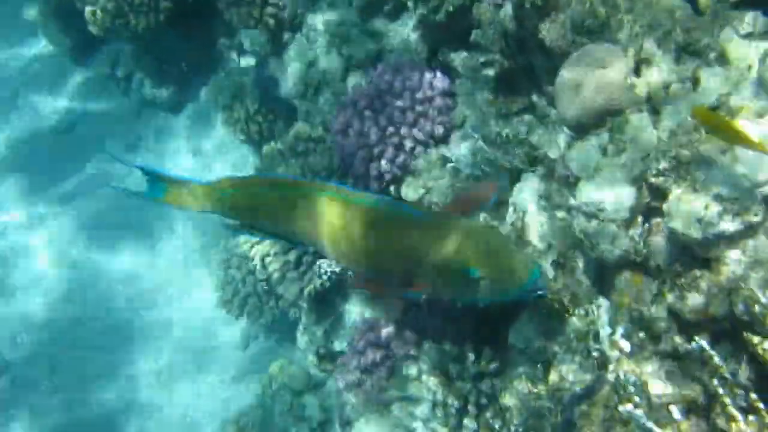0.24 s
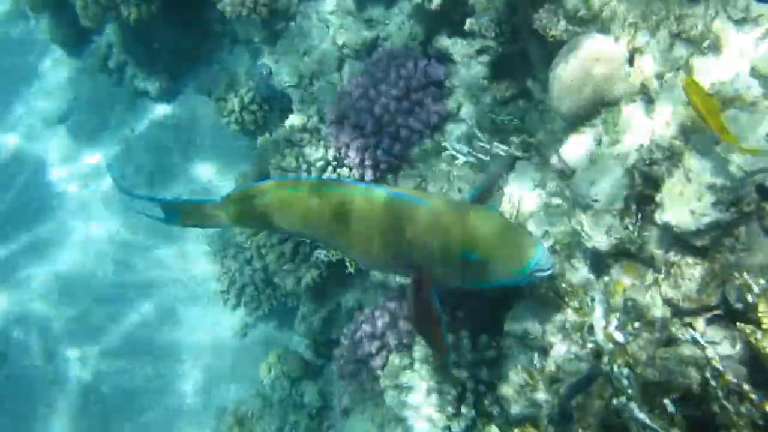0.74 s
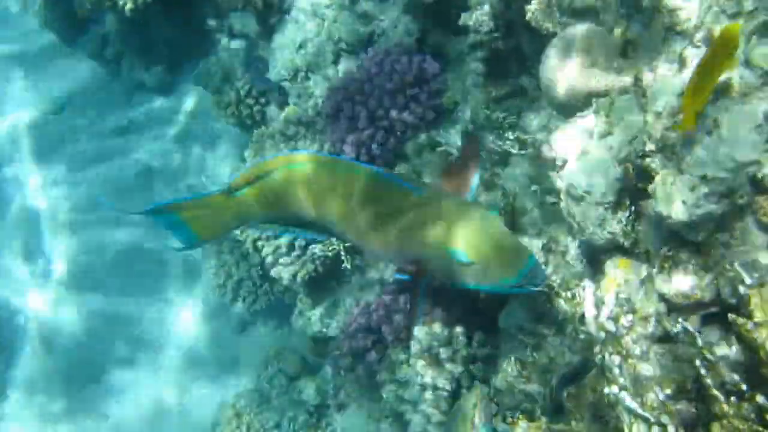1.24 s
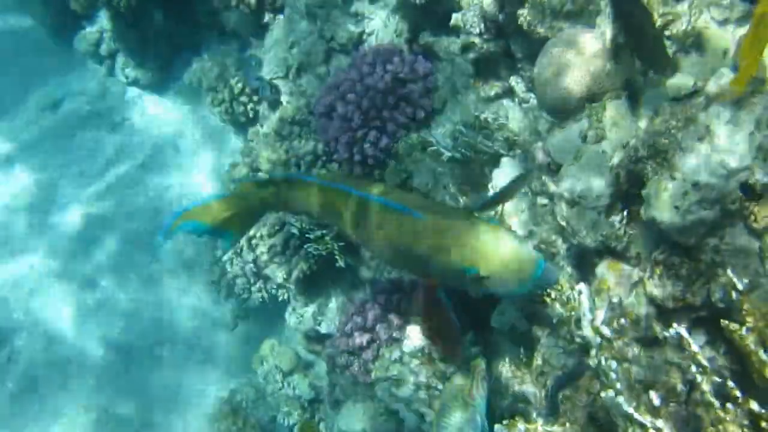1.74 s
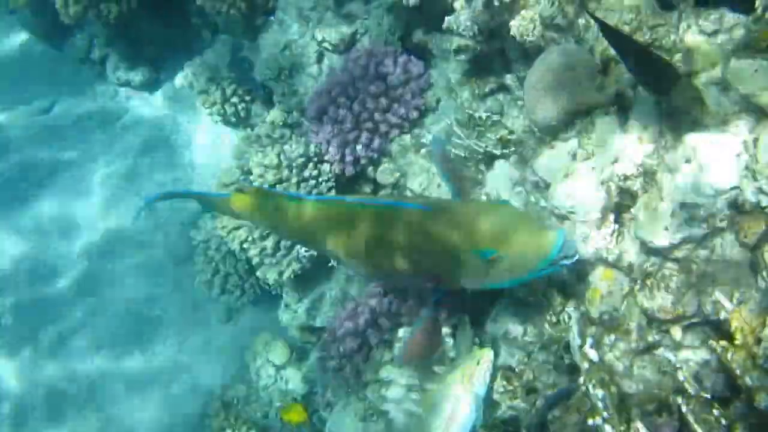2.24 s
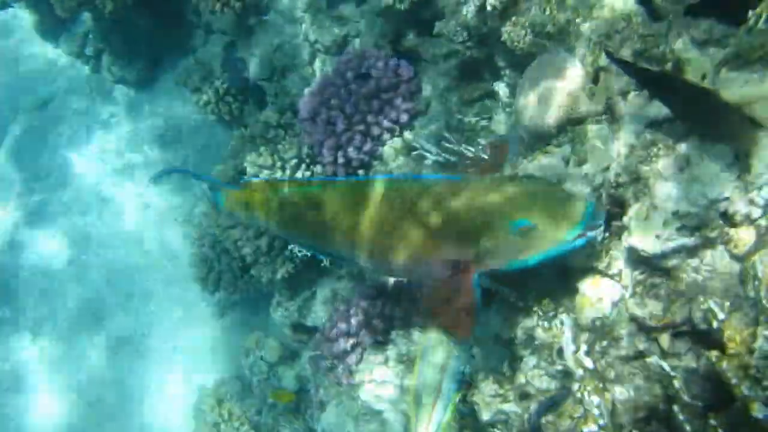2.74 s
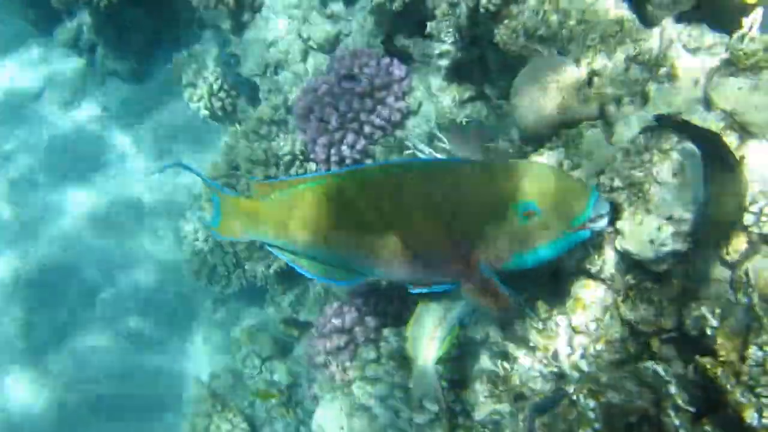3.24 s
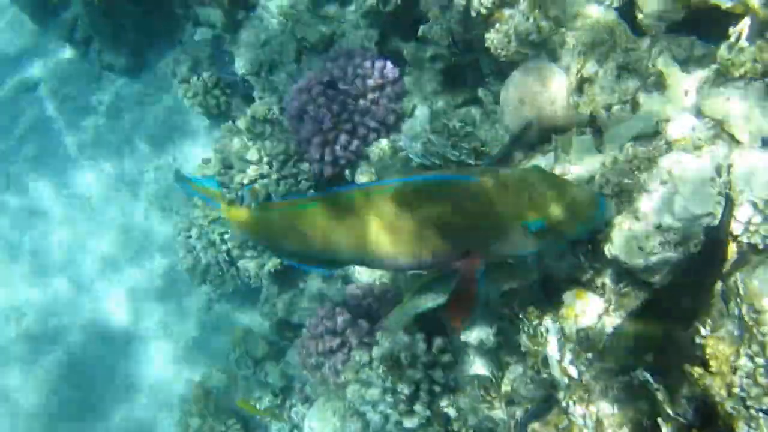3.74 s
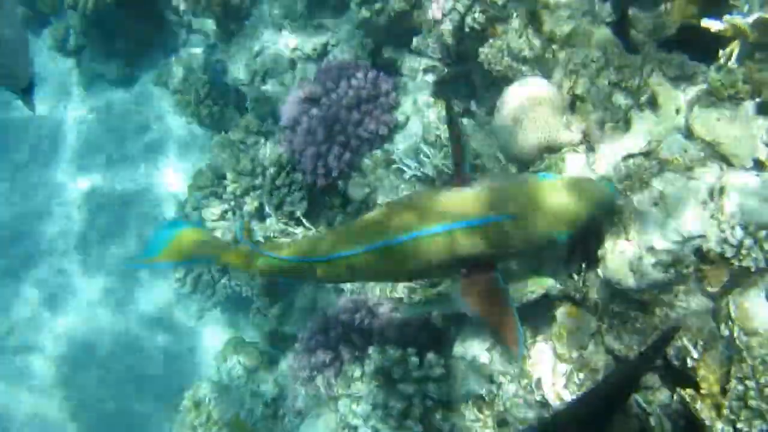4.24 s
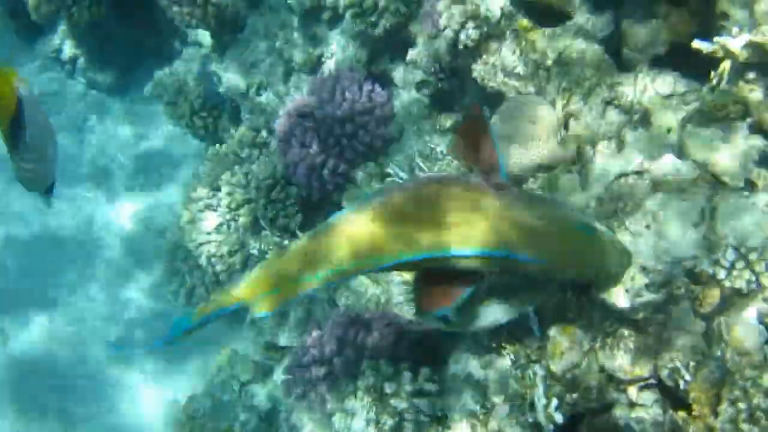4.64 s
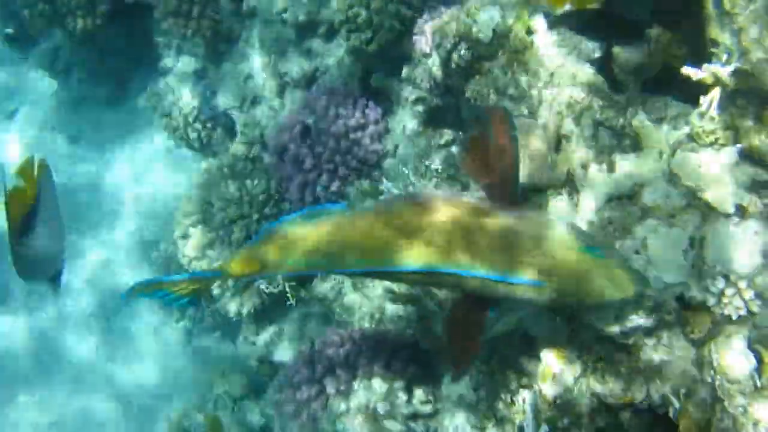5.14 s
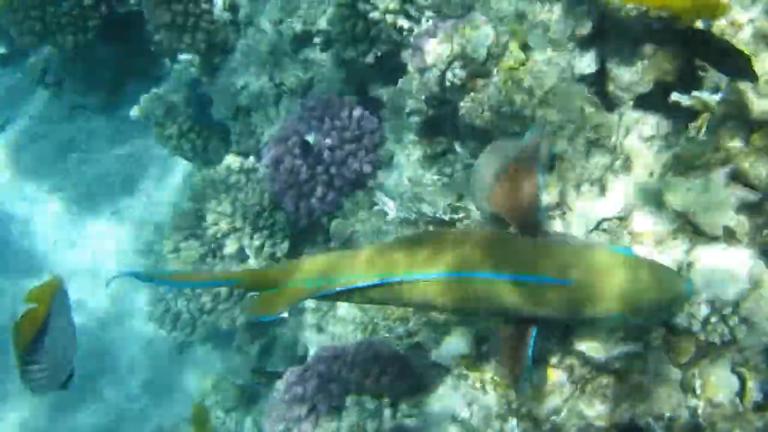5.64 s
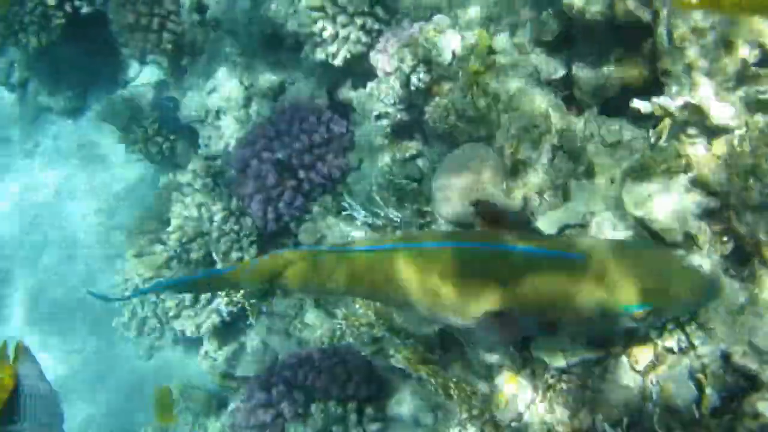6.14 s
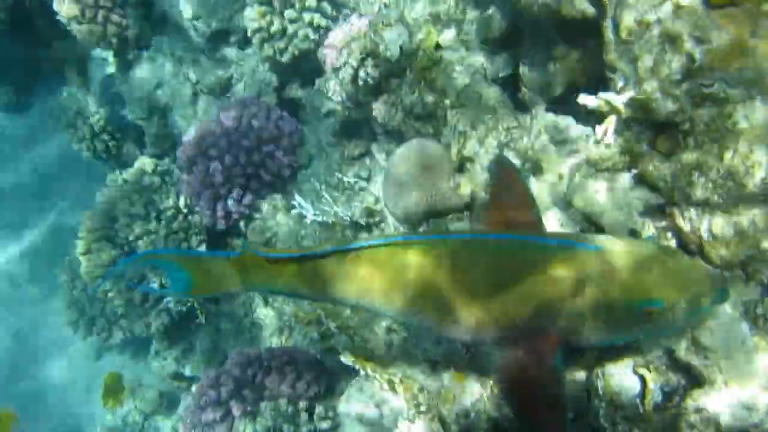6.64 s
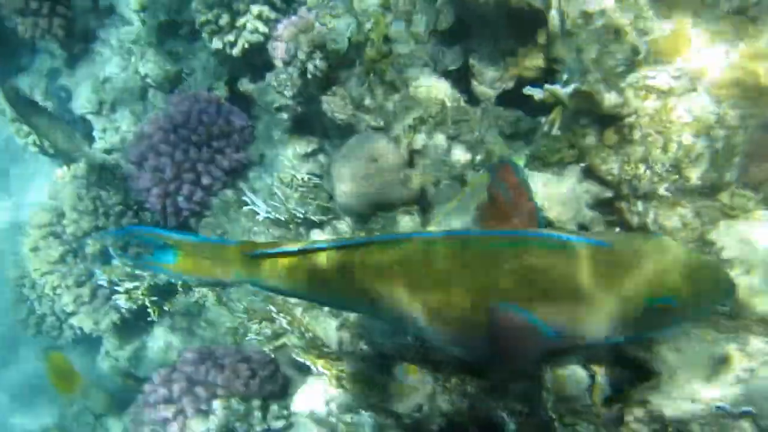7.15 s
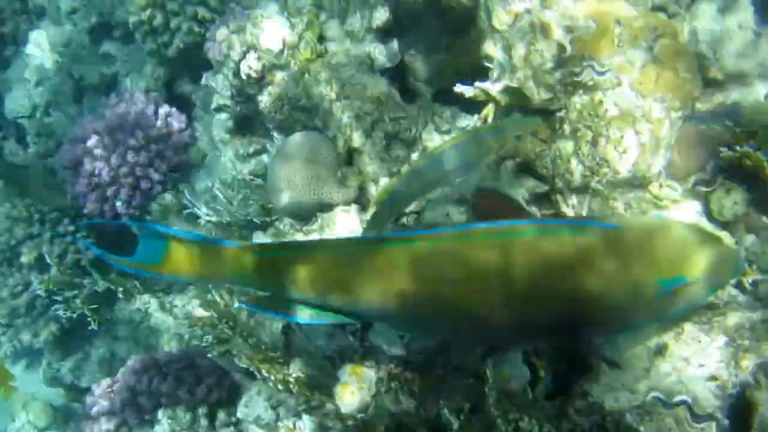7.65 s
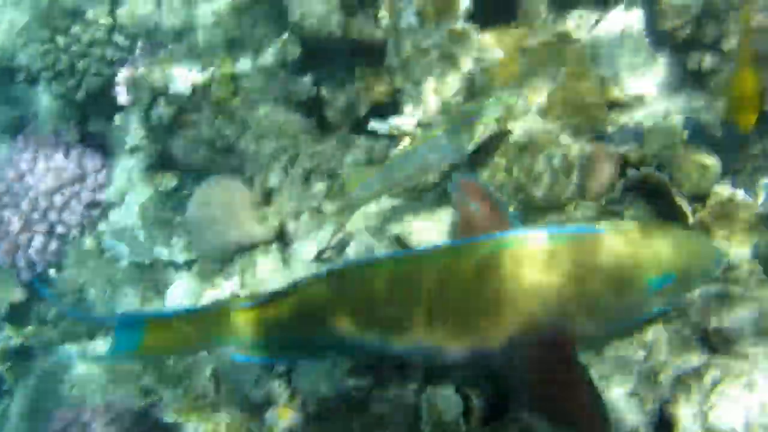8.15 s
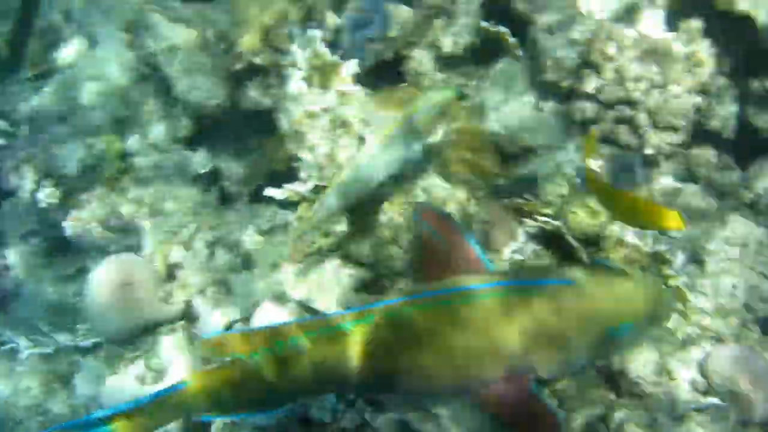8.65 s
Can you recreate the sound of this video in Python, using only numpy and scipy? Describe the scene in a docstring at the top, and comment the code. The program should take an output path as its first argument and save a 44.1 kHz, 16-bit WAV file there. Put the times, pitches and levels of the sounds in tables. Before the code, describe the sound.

Close, muffled underwater sound over a coral reef, bass-heavy, with bright little snaps scattered left and right. Water surges bump the casing, a few tiny bubbles blip, and coral breaks in dry clicks as a fish grazes. Short ringing taps follow, then a strong churning surge with gritty scraping and a very heavy thud. It quiets to shrimp sizzle and light rumble, then erupts in quick cracks and booming thumps, ending with a last short bite.

```python
"""A camera in a watertight case hovers over a coral reef where a parrotfish grazes; shrimp snap throughout.
From the start damped thumps rock the case in rumbling, gurgling flow, coral cracks and a few bubbles ring.
From 2.5 s taps ring the case modes; near 4 s, in the strongest flow, come knocks, clacks and gritty scrapes,
then the heaviest thumps at 4.8 s and, after a calm, a dense burst from 6.7 s; a last one comes at 8.2 s.
The gain starts lowered, ducks at the heaviest thumps and creeps back; the walls colour the reef's bright sounds."""
import sys
import numpy as np
from scipy import signal
from scipy.fft import rfft, irfft, next_fast_len
from scipy.io import wavfile
from scipy.ndimage import uniform_filter1d, minimum_filter1d, map_coordinates

SR = 44100
rng = np.random.default_rng(int(sys.argv[2]) if len(sys.argv) > 2 else 0)


def store_wav(level_fs):
    """Save 16-bit WAV to argv[1]."""
    pcm = np.round(np.clip(np.atleast_2d(level_fs), -1, 1) * 32767)
    wavfile.write(sys.argv[1], SR, pcm.T.astype(np.int16))


N = 392049

# faint whine of the camera: (frequency [Hz], level [dB], left over right [dB])
WHINE_TONES = [(2008, -76, 3), (5890, -82, 3.5), (15734, -91, -0.5)]
# strength of the water flowing past the case: (time [s], level over calm water [dB])
FLOW = [(0.0, 2.5), (0.5, 10), (0.8, 6), (1.09, 9.5), (1.45, -1.5), (2.45, 2.5), (2.95, -2.5), (3.8, 8),
        (4.08, 13.5), (4.7, 13.5), (5.22, 0), (6.25, 0), (6.6, -1), (7.35, 3), (7.6, 10.5), (7.92, 8),
        (8.22, 11), (8.89, -1.5)]
# spectra of the water's rumble, churn, gurgle and cavity drone: (frequency [Hz], relative level [dB])
RUMBLE_SPECTRUM = [(15, -48), (28, -23.5), (40, -6), (65, -4), (100, 2.5), (130, -2), (170, -18),
                   (260, -35), (500, -88)]
CHURN_SPECTRUM = [(80, -23.5), (130, 5), (170, 0), (218, -1), (255, -10.5), (295, -19.5), (330, -27),
                  (375, -38.5), (800, -77)]
GURGLE_SPECTRUM = [(250, -17.5), (335, -3.5), (385, -5.5), (470, 0.5), (560, -3), (680, -5), (800, -12.5),
                   (1050, -18), (1350, -15), (1650, -40), (5000, -68.5)]
DRONE_SPECTRUM = [(230, -43.5), (295, -4.5), (328, 3.5), (365, -11.5), (450, -50.5)]
# course of the cavity drone: (time [s], level [dB])
DRONE_COURSE = [(0, -44.5), (1.6, -53), (2.6, -52.5), (7.8, -56), (8.89, -45.5)]
# passing swells of the rumble and of the sloshing: (middle [s], half length [s], level [dB])
RUMBLE_SWELLS = [(1.7, 0.1, -26.5)]
SLOSH_SWELLS = [(2.36, 0.34, -45), (4.35, 0.52, -47.5)]
# hollow resonances stirred by sloshing water: (frequency [Hz], nominal width [Hz], relative level [dB])
SLOSH_MODES = [(420, 110, -15.5), (511, 130, 4.5), (686, 86, 0.5), (897, 160, -12)]
# likeness of the two ports: (frequency [Hz], coherence [0 to 1])
PORT_COHERENCE = [(100, 0.98), (200, 0.99), (320, 0.52), (500, 0.37), (1000, 0.44), (2000, 0), (16000, 0)]
# surges that shove the case: (crest time [s], level [dB], frequency [Hz])
THUMPS = [(0.308, -16.5, 114), (0.628, -13.5, 122), (0.927, -12, 129), (1.437, -8.5, 83), (1.471, -15, 82),
          (1.689, -17, 99), (1.787, -20, 80), (2.254, -11.5, 95), (2.642, -16, 117), (2.724, -16.5, 142),
          (3.214, -16.5, 95), (3.621, -15, 140), (3.968, -11.5, 193), (4.108, -7, 121), (4.135, -12, 117),
          (4.177, -10, 181), (4.354, -9, 137), (4.496, -11.5, 123), (4.586, -10.5, 152), (4.772, -4, 101),
          (4.789, -1, 196), (4.796, 0.5, 101), (4.834, -0.5, 113), (5.397, -8.5, 93), (5.667, -11, 139),
          (5.699, -13.5, 93), (6.738, 1.5, 96.5), (6.858, -5.5, 99), (6.901, -5, 129), (6.931, -11, 107),
          (6.986, 2.5, 98), (7.028, -7, 76.5), (7.062, -14, 136), (7.191, -14.5, 163), (8.21, -14.5, 115),
          (8.319, -17, 121), (8.374, -13, 112), (8.858, -10, 93)]
# dull knocks on the case, each with a short grind: (time [s], level [dB], frequency [Hz], grind level [dB])
KNOCKS = [(1.703, -30.5, 393, -41), (2.725, -20, 262, -43), (2.884, -22, 242, -28),
          (3.965, -17.5, 313, -36), (4.033, -23, 327, -38), (4.042, -17.5, 290, -39),
          (4.065, -17, 273, -38), (4.084, -10, 242, -43), (4.17, -15, 323, -31.5), (4.18, -20.5, 346, -33),
          (4.785, -1, 241, -37.5), (4.824, -11, 287, -26), (6.734, -23.5, 247, -42), (6.868, -29, 310, -36),
          (6.915, -22.5, 260, -42), (6.971, -17, 216, -42), (7.225, -26, 325, -48),
          (7.244, -14.5, 253, -58), (8.3, -19.5, 386, -35.5), (8.306, -21.5, 332, -38),
          (8.354, -15.5, 273, -44.5)]
# small bubbles: (time [s], level [dB], starting frequency [Hz])
BUBBLES = [(0.559, -49, 1230), (0.852, -48, 1360), (0.97, -48, 1410), (1.109, -52, 1250),
           (1.639, -47, 1360), (2.168, -49.5, 1490), (2.538, -43.5, 1310), (3.845, -51, 1220)]
# the nearest shrimp snaps: (time [s], level [dB], frequency [Hz], left over right [dB])
NEAR_SNAPS = [(0.148, -40, 4400, 7), (0.36, -42, 3960, 3), (0.384, -41, 2900, 0), (0.481, -45, 6500, 3),
              (1.109, -44.5, 2600, 0), (1.228, -48, 5100, 5), (1.4085, -40, 1840, 1),
              (1.699, -44.5, 2160, 5), (1.8595, -39.5, 2830, 10), (2.0917, -41, 4440, 2),
              (3.0737, -36, 2970, 1), (3.29, -42, 5160, -1), (3.477, -42, 5340, 6),
              (3.948, -44.5, 3400, -4), (4.111, -39, 4740, -1), (4.326, -42, 3970, 5),
              (4.358, -43.5, 3780, -2), (5.19, -42.5, 6760, 2), (5.333, -37.5, 4600, -2),
              (5.434, -43.5, 4100, -6), (5.56, -42, 3370, 0), (5.971, -44.5, 4100, 0),
              (6.1644, -45.5, 8140, 6), (6.367, -39, 4600, -15), (6.519, -46, 5500, -4),
              (7.1874, -36, 2570, -3), (7.4936, -38.5, 7240, 5.5), (7.605, -41, 6800, 2.5),
              (8.5963, -38.5, 4340, -2)]
# spectrum of the distant shrimp's sizzle: (frequency [Hz], relative level [dB])
SIZZLE_SPECTRUM = [(600, 1), (1100, 1.5), (1430, 2.5), (1750, -3.5), (2400, -3.5), (3300, -5.5),
                   (3900, -10.5), (5500, -11), (8000, -16), (9400, -19.5), (11500, -30), (13500, -41),
                   (16000, -44.5)]
# resonances of the wall at each port: (frequency [Hz], nominal width [Hz], level above the rest [dB])
LEFT_WALL = [(2770, 120, 3.5), (4900, 130, 6.5), (4580, 360, 7), (6180, 550, 6), (6690, 200, 5.5),
             (8570, 260, 5)]
RIGHT_WALL = [(2150, 110, 8.2), (3590, 170, 7), (4740, 160, 8), (4600, 130, 0.82), (7220, 440, 7),
              (9000, 480, 7.2)]
# crisp taps that ring the case: (time [s], level [dB], brightness [dB per octave])
TAPS = [(2.5185, -23, -0.5), (2.524, -19, -6), (2.603, -31, -8), (2.7233, -16.5, 3), (2.789, -39, -5),
        (2.847, -36.5, -10), (3.051, -22.5, -10), (5.971, -24.5, -4.5), (6.8945, -28, -2), (6.917, -33, -7),
        (6.9685, -26.5, -2), (7.187, -36, -9), (7.204, -32, -9)]
# modes of the tapped case: (frequency [Hz], relative level [dB], 60 dB decay time [s])
CASE_MODES = [(434, 0, 0.025), (511, 1, 0.026), (678, -2, 0.022), (925, -8, 0.03), (1246, -12, 0.022),
              (1380, -21, 0.029)]
# dull clacks of crumbling coral: (time [s], level [dB], frequency [Hz])
CLACKS = [(1.41, -42, 1700), (2.185, -33, 940), (2.233, -39, 1310), (2.886, -30.5, 1100), (3.986, -37, 695),
          (4.044, -46, 900), (4.054, -45, 1100), (4.065, -37, 1150), (4.077, -40, 1000),
          (4.086, -43.5, 1100), (4.125, -33.5, 1000), (4.138, -38, 1130), (4.169, -31, 990),
          (4.175, -33.5, 1130), (4.18, -33.5, 950), (4.789, -19, 700), (4.823, -33, 600), (4.833, -28, 700),
          (5.122, -35, 1050), (5.135, -37, 585), (6.7365, -30.5, 820), (6.867, -33, 800),
          (6.8725, -29, 620), (6.8945, -30.5, 650), (6.916, -32, 680), (6.968, -34, 1510),
          (8.155, -30.5, 1410), (8.172, -37, 1150), (8.189, -28.5, 990), (8.2995, -28, 990),
          (8.33, -39, 705), (8.352, -37, 1410)]
# hard cracks of coral: (time [s], level [dB], left over right [dB], brightness [dB per octave])
CRACKS = [(0.6798, -20, -1.5, -1), (0.714, -21.5, -9, 2), (0.8779, -24, 2.5, -1), (0.9731, -27.5, 0, -5),
          (1.289, -27.5, -4, 0.5), (1.432, -23.5, 0, -2.5), (1.5481, -39, 1.5, 12), (2.526, -33.5, -6, 2),
          (2.636, -31, 8, -2.5), (2.7214, -32, -4, -5.5), (2.887, -32, -5.5, 0), (3.9635, -38, 3, 0.5),
          (4.036, -40.5, -6, 2.5), (4.064, -40, 7, 4.5), (4.085, -42.5, 0, 4), (4.124, -36.5, 2.5, 6),
          (4.169, -30, -3, 6), (4.1744, -41.5, 6, -12.5), (4.183, -26, -3.5, 2.5), (4.7852, -31, 1, 10),
          (4.788, -27.5, -6, 0.5), (4.7978, -26, 3, -2), (4.805, -29, 2, -5), (4.8223, -27.5, -2, -4),
          (5.1211, -23.5, 1, 0.5), (5.9705, -33, -3, -5.5), (6.722, -31, 7, 3), (6.7382, -23, -6, 5),
          (6.7464, -31.5, 11, 0), (6.852, -36.5, 7, 1), (6.8662, -33, 6, 5.5), (6.8723, -14.5, 8, 6),
          (6.8916, -29, 10.5, 2.5), (6.9054, -19, 7.5, 2), (6.917, -29.5, 5, 1), (6.9322, -38.5, 5, 2),
          (6.952, -30, 4, -1), (6.9682, -22.5, -2, -7.5), (7.0325, -33, -6.5, 4), (7.1865, -38, 0, -5),
          (7.9746, -26, 2, -1), (8.1885, -36, 6, 0), (8.196, -39.5, 4, 1), (8.2988, -27.5, -6, -1),
          (8.331, -37.5, 3, 1), (8.3543, -33.5, 8, -4.5)]
# strokes of teeth: (middle [s], half length [s], dull rasp level [dB], bright crunch level [dB])
SCRAPES = [(1.434, 0.011, -45, -48.5), (2.15, 0.063, -41, -66), (2.88, 0.044, -45, -51.5),
           (4.053, 0.03, -41, -48), (4.176, 0.013, -32, -40.5), (4.737, 0.012, -28.5, -49),
           (4.79, 0.018, -23, -52.5), (4.83, 0.005, -28, -51.5), (6.827, .025, -55, -49),
           (6.896, 0.019, -40, -41.5), (7.217, 0.032, -43, -60), (8.164, 0.02, -35, -56),
           (8.328, 0.017, -38, -61.5)]
# spectra of cracks and crunches, and of rasps and knock puffs: (frequency [Hz], relative level [dB])
CRACK_SPECTRUM = [(300, 14), (700, 1), (1400, 4), (2800, 4.5), (4700, -0.5), (7000, -6), (9500, -8.5),
                  (12000, -22), (16000, -33.5)]
RASP_SPECTRUM = [(150, -13.5), (300, 18), (450, 9.5), (600, -3.5), (800, -1), (1150, -2.5), (1400, 0.5),
                 (1650, -29.5), (3000, -26), (8000, -44)]


def amp(db):
    """The decibel law: level to amplitude gain."""
    return 10 ** (np.asarray(db) / 20)


def unit(x):
    """Normalisation to rms 1."""
    return x / np.sqrt(np.mean(x ** 2) + 1e-20)


def crest(x):
    """Normalisation by short-time power: the loudest two milliseconds get rms 1."""
    power = np.mean(np.atleast_2d(x) ** 2, 0)
    return x / np.sqrt(uniform_filter1d(power, size=88).max() + 1e-20)


def along(points, hz):
    """Interpolation of (frequency, value) points on a logarithmic axis."""
    f, v = np.transpose(points)
    return np.interp(np.log(hz + 1), np.log(f + 1), v)


def course(rows):
    """Linear interpolation of (time, value) rows, one value per sample."""
    s, value = np.transpose(rows)
    return np.interp(np.arange(N) / SR, s, value)


def wobble(rate):
    """Slow random modulation: a smooth curve through `rate` random knots a second."""
    knots = rng.standard_normal(int(N * rate / SR) + 4)
    return map_coordinates(knots, [np.arange(N) * rate / SR])


def swells(rows):
    """Gaussian envelopes: one swell of gain for each (middle, half length, level) row."""
    t = np.arange(N) / SR
    return sum(amp(db) * np.exp(-((t - s) / half) ** 2) for s, half, db in rows)


def coloured(x, gain):
    """Minimum-phase filtering: a folded cepstrum gives the causal filter of magnitude gain(Hz)."""
    n = x.shape[-1]
    m = 2 * next_fast_len(n // 2 + 2048)
    magnitude = np.maximum(gain(np.fft.rfftfreq(m, 1 / SR)), 1e-6)
    cepstrum = irfft(np.log(magnitude), m)
    cepstrum[1:m // 2] *= 2
    cepstrum[m // 2 + 1:] = 0
    return irfft(rfft(x, m) * np.exp(rfft(cepstrum)), m)[..., :n]


def resonance(f, hz, q):
    """Magnitude response of a simple resonator of quality factor q."""
    return 1 / np.hypot(1, q * (f / hz - hz / (f + 1)))


def panned(lead_db):
    """Level-difference stereo: left and right gains of mean power 1."""
    return unit(amp([[lead_db / 2], [-lead_db / 2]]))


def add(track, s, sound):
    """Superposition of a sound onto the track from time s."""
    i = max(round(s * SR), 0)
    track[:, i:i + sound.shape[-1]] += sound[..., :max(N - i, 0)]


def at_ports(pair):
    """Partial coherence: two unrelated signals are blended to be most alike in the bass."""
    n = pair.shape[-1]
    coherence = along(PORT_COHERENCE, np.fft.rfftfreq(n, 1 / SR))
    turn = np.arccos(np.clip(coherence, -1, 1)) / 2
    mid, side = irfft(rfft(pair) * [np.cos(turn), np.sin(turn)], n)
    return np.array([mid + side, mid - side])


def rush(spectrum):
    """Turbulence as filtered noise: stereo, rms 1, with the given spectrum."""
    noise = rng.standard_normal((2, N))
    return unit(at_ports(coloured(noise, lambda f: amp(along(spectrum, f)))))


def grains(rate, spread_db, t60):
    """Shot noise: random impulses of random size decay as noise, independent at each port."""
    chance, size = rng.random(N), np.minimum(rng.exponential(size=N), 3.5)
    power = (chance < rate / SR) * amp(spread_db * size) ** 2
    fade = amp(-60 / (t60 * SR)) ** 2  # loss of power per sample
    envelope = np.sqrt(signal.lfilter([1], [1, -fade], power))
    return unit(envelope * rng.standard_normal((2, N)))


def through_case(x):
    """Resonant transmission: each port hears the ringing of the wall in front of it."""
    def wall(modes):
        return lambda f: 1 + sum((amp(db) - 1) * resonance(f, hz, hz / width) ** 2 for hz, width, db in modes)
    return np.array([coloured(x[0], wall(LEFT_WALL)), coloured(x[1], wall(RIGHT_WALL))])


def whine():
    """Steady pure tones: the thin whine of the camera's electronics."""
    t = np.arange(N) / SR
    return sum(np.sqrt(2) * amp(db) * panned(lead_db) * np.sin(2 * np.pi * hz * t)
               for hz, db, lead_db in WHINE_TONES)


def water():
    """Flow noise: eddies press on the case, faster flow churns and gurgles more, and its cavity drones."""
    flow_db = course(FLOW)
    eddies = wobble(16)
    # level in calm water [dB] + growth [dB per dB of flow]
    rumble_gain = amp(-28.5 + 0.48 * flow_db) + swells(RUMBLE_SWELLS)
    rumble = rumble_gain * amp(0.8 * eddies) * rush(RUMBLE_SPECTRUM)
    churn = amp(-34.5 + 0.99 * flow_db + 2.47 * eddies) * rush(CHURN_SPECTRUM)
    gurgle = amp(-52 + 0.33 * flow_db + 2.8 * wobble(30)) * rush(GURGLE_SPECTRUM)
    drone = amp(course(DRONE_COURSE) + 0.95 * wobble(6.9)) * rush(DRONE_SPECTRUM)
    return (rumble + churn + drone) * panned(-2.1) + gurgle * panned(-0.3)


def sloshing():
    """Noise-driven resonance: water slops in waves, each hollow band swelling and fading on its own."""
    def band(hz, width, db):
        noise = coloured(rng.standard_normal((2, N)), lambda f: resonance(f, hz, hz / width) ** 2)
        return amp(db + 2.4 * wobble(22)) * unit(at_ports(noise))
    return swells(SLOSH_SWELLS) * unit(sum(band(*mode) for mode in SLOSH_MODES))


def thumps():
    """Damped oscillation: a surge rocks the case a few cycles, swelling faster than it dies."""
    track, t = np.zeros((2, N)), np.arange(-SR // 20, SR // 20) / SR
    for s, db, hz in THUMPS:
        cycles = hz * t
        swell = np.exp(-(cycles / np.where(t < 0, 0.6, 1.1)) ** 2)
        add(track, s + t[0], amp(db + 0.5) * swell * np.cos(2 * np.pi * cycles))
    return track * panned(-2.5)


def knocks():
    """Heavily damped impact: a soft blow gives one short ring and a dull puff of noise."""
    track, t = np.zeros((2, N)), np.arange(SR // 12) / SR
    for s, db, hz, _ in KNOCKS:
        ring = np.sin(2 * np.pi * hz * t) * amp(-60 * t / 0.027) * (1 - np.exp(-t / 0.002))
        puff = at_ports(rng.standard_normal((2, len(t)))) * amp(-60 * t / 0.04) * (1 - np.exp(-t / 0.0016))
        puff = coloured(puff, lambda f: amp(along(RASP_SPECTRUM, f)) * resonance(f, 2.18 * hz, q=2.1))
        add(track, s, amp(db - 5.5) * crest(crest(ring) + 0.22 * crest(puff)))
    return track * panned(-1.3)


def bubbles():
    """Free bubble oscillation: a freed bubble rings briefly, its pitch creeping up."""
    track, t = np.zeros((2, N)), np.arange(SR // 10) / SR
    for s, db, hz in BUBBLES:
        phase = hz * t * (1 + 0.74 * t) + rng.random((2, 1)) / 3  # in turns
        ring = np.sin(2 * np.pi * phase) * amp(-60 * t / 0.03) * (1 - np.exp(-t / 0.001))
        add(track, s, amp(db + 6.5) * crest(ring))
    return track * panned(4.1)


def snap(hz, q):
    """Cavitation: one collapsing shrimp bubble, a noise burst in a narrow band round its own pitch."""
    t = np.arange(SR // 40) / SR
    rise = 1 - np.exp(-(t / 0.001) ** 2)
    decay = amp(-60 * t / 0.005) + amp(-22) * amp(-60 * t / 0.035)  # burst and faint tail
    burst = rise * decay * rng.standard_normal((2, len(t)))
    band = lambda f: resonance(f, hz, q) ** 2 + 0.053
    treble = lambda f: amp(along([(7000, 2.5), (9500, 5.0), (12500, -9.0)], f))
    return crest(coloured(burst, lambda f: band(f) * treble(f)))


def shrimp():
    """Superposed point sources: near snaps stand out, farther ones tick, the farthest merge in a sizzle."""
    track = np.zeros((2, N))
    for s, db, hz, lead_db in NEAR_SNAPS:
        add(track, s, amp(db - 2.0) * panned(lead_db) * snap(hz, q=2.9))
    for when, size, pitch, side in rng.random(size=(190, 4)):
        gain = amp(-55.5 + 7.5 * size ** 3)  # most are faint
        far_snap = snap(1500 * 5.5 ** pitch, q=4.5)
        add(track, when * N / SR, gain * panned(10 * (side - 0.5)) * far_snap)
    sizzle = grains(rate=2100, spread_db=-1.5, t60=0.023)
    sizzle = coloured(sizzle, lambda f: amp(along(SIZZLE_SPECTRUM, f)))
    return track + amp(-51.5) * unit(sizzle) * panned(0.41)


def taps():
    """Modal excitation: a crisp tap rings all the case's modes at once, a softer one the higher ones less."""
    track, t = np.zeros((2, N)), np.arange(SR // 12) / SR
    hz, level_db, t60 = np.transpose(CASE_MODES)[:, :, None]
    for s, db, tilt_db in TAPS:
        scatter_db = 3.1 * rng.standard_normal((2, len(hz), 1))
        mode_db = level_db + tilt_db * np.log2(hz / hz[0]) + scatter_db
        phase = hz * t + rng.random(hz.shape) / 2  # in turns
        ring = (amp(mode_db - 60 * t / t60) * np.sin(2 * np.pi * phase)).sum(1)
        attack = 1 - np.exp(-t / 0.0017)
        add(track, s, amp(db - 4.5) * crest(ring * attack))
    return track * panned(1.5)


def clacks():
    """Damped resonance of crumbling coral: a noise burst of milliseconds in one broad, hollow band."""
    track, t = np.zeros((2, N)), np.arange(SR // 20) / SR
    envelope = amp(-60 * t / 0.0075) * (1 - np.exp(-t / 0.00046))
    for s, db, hz in CLACKS:
        burst = at_ports(rng.standard_normal((2, len(t)))) * envelope
        low_pass = lambda f: 1 / np.hypot(1, (f / 1550) ** 10)
        colour = lambda f: resonance(f, hz, q=1.4) ** 2 * low_pass(f)
        add(track, s, amp(db) * crest(coloured(burst, colour)))
    return track * panned(3.3)


def cracks():
    """Brittle fracture and comb filtering: a click, banded by a close rock echo, with scatter behind."""
    track, t = np.zeros((2, N)), np.arange(SR // 12) / SR
    rise = 1 - np.exp(-(t / 0.0009) ** 4)
    decay = amp(-60 * t / 0.0019) + amp(-35) * amp(-60 * t / 0.018)  # click and scatter
    for s, db, lead_db, tilt_db in CRACKS:
        echo_s = 0.00045 * 2 ** (rng.random() - 0.5)
        bands = lambda f: np.abs(1 - 0.6 * np.exp(-2j * np.pi * f * echo_s))  # inverted echo
        tilted = lambda f: amp(along(CRACK_SPECTRUM, f) + tilt_db * np.log2((f + 300) / 4000))
        noise = rise * decay * rng.standard_normal((2, len(t)))
        click = coloured(noise, lambda f: bands(f) * tilted(f))
        add(track, s, amp(db - 6.0) * panned(lead_db) * crest(click))
    return track


def strokes(rows, spectrum, rate):
    """Friction on rough coral: a quick run of grains is freed as the pressure swells and eases."""
    grit = at_ports(grains(rate, spread_db=2.0, t60=0.00087))
    return swells(rows) * unit(coloured(grit, lambda f: amp(along(spectrum, f))))


def rasps():
    """Low-frequency friction noise: the dull part of each scrape, and a brief grind under each knock."""
    half = 0.0036  # half length of a grind [s]
    grinds = [(s + half, half, grind_db) for s, _, _, grind_db in KNOCKS]
    dull_strokes = [(s, half_s, dull_db) for s, half_s, dull_db, _ in SCRAPES]
    rubbing = strokes(dull_strokes, RASP_SPECTRUM, rate=1000)
    return (rubbing + strokes(grinds, RASP_SPECTRUM, rate=2400)) * panned(2.9)


def crunches():
    """High-frequency friction noise: the bright part of each scrape of teeth."""
    bright_strokes = [(s, half_s, bright_db) for s, half_s, _, bright_db in SCRAPES]
    return strokes(bright_strokes, CRACK_SPECTRUM, rate=1800)


def scene():
    """Superposition: sounds at the case add to the reef's bright sounds passed through its walls."""
    background = whine() + water() + sloshing()
    blows = thumps() + knocks() + taps()
    reef = through_case(shrimp() + cracks() + crunches())
    return background + blows + bubbles() + clacks() + rasps() + reef


def gain_control(x):
    """Peak limiting: gain drops quickly for a peak over the ceiling, then climbs at a steady rate in dB."""
    ceiling_db, start_duck_db, recovery_db_per_s = -1, 5.5, 3
    over_db = 20 * np.log10(np.abs(x).max(0) + 1e-9) - ceiling_db
    over_db[0] = start_duck_db
    climb = recovery_db_per_s * np.arange(N) / SR
    duck_db = np.maximum.accumulate(np.maximum(over_db, 0) + climb) - climb
    early_db = minimum_filter1d(-duck_db, size=400)  # starts just ahead of the peak
    return x * amp(uniform_filter1d(early_db, size=300))


def record(dry):
    """Limiting and band limitation: the camera rides its gain, clips, and keeps nothing above 16.2 kHz."""
    clipped = np.clip(gain_control(dry), -1, 1)
    passband = np.fft.rfftfreq(N, 1 / SR) < 16200
    return irfft(rfft(clipped) * passband, N)


dry = scene()
out = record(dry)
store_wav(out)
```